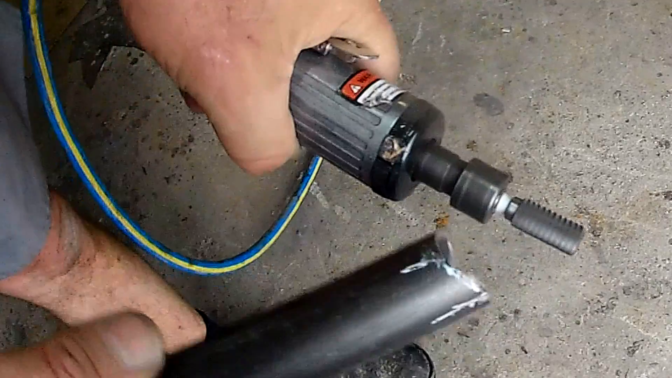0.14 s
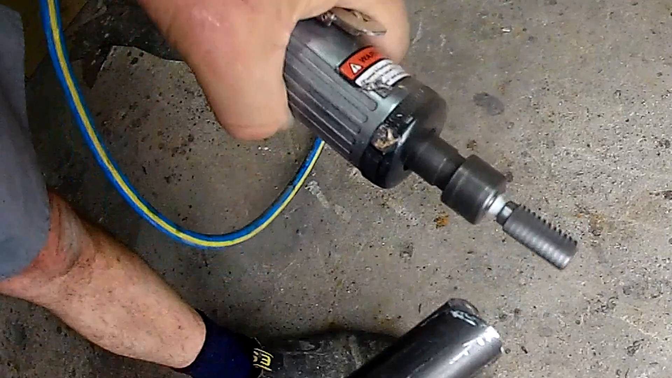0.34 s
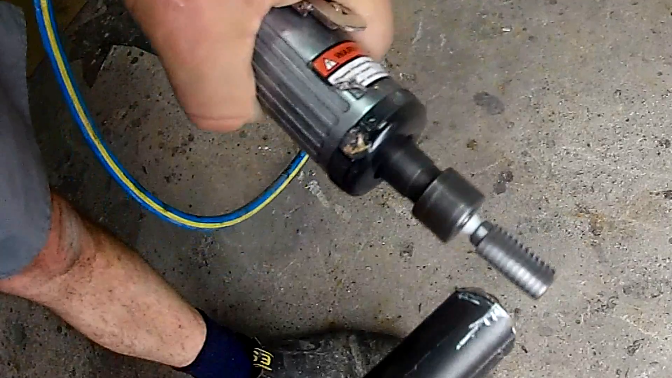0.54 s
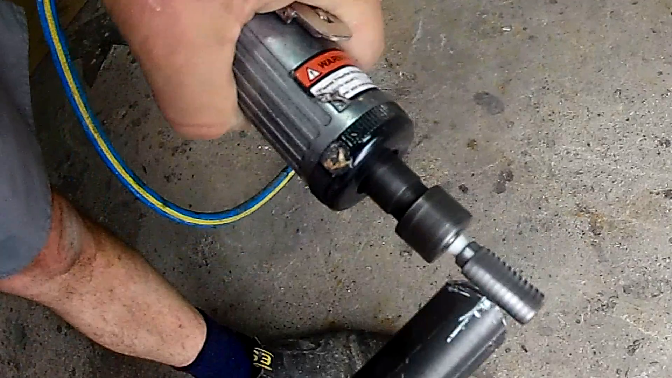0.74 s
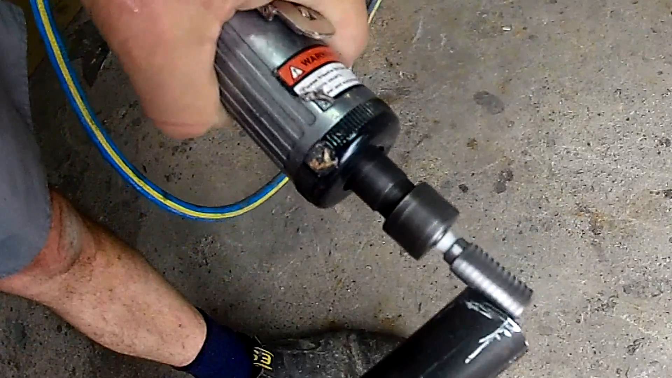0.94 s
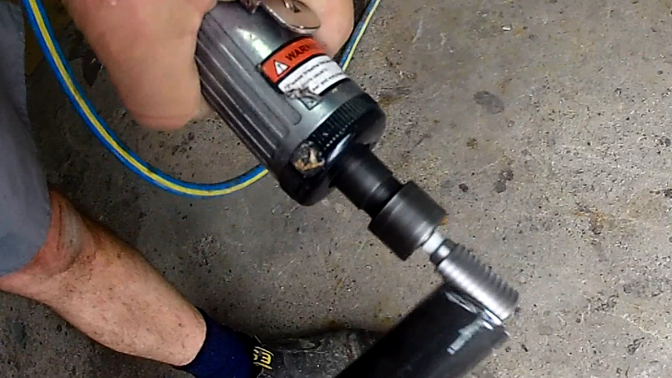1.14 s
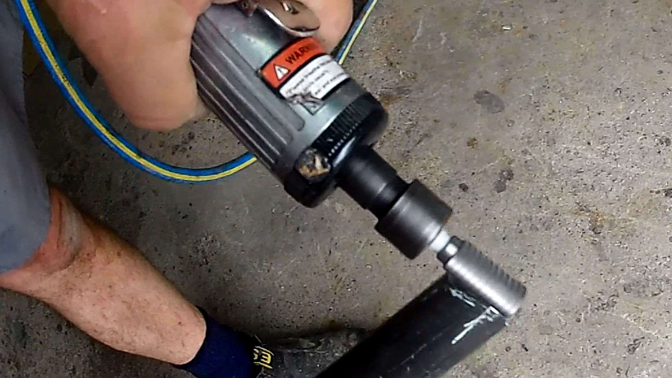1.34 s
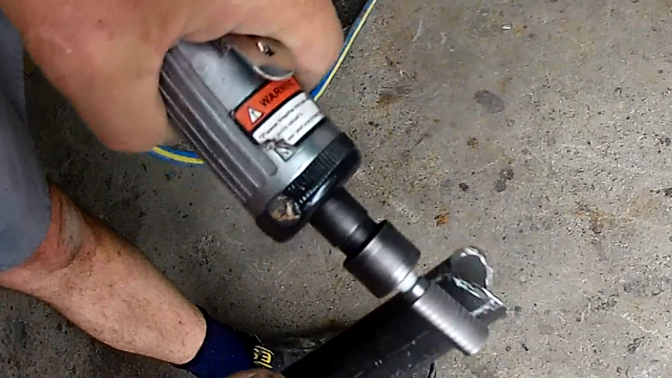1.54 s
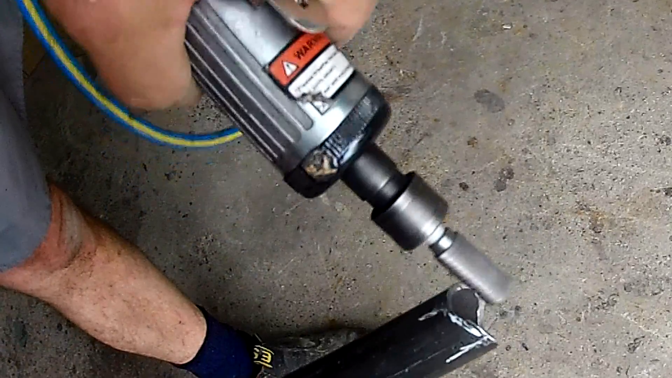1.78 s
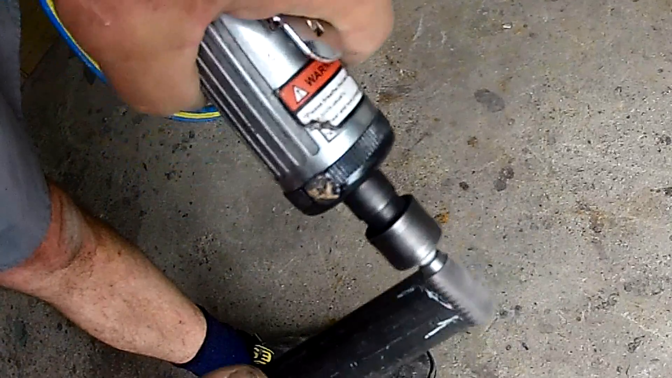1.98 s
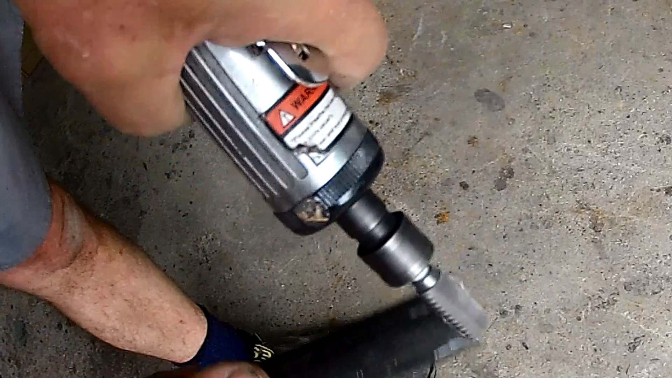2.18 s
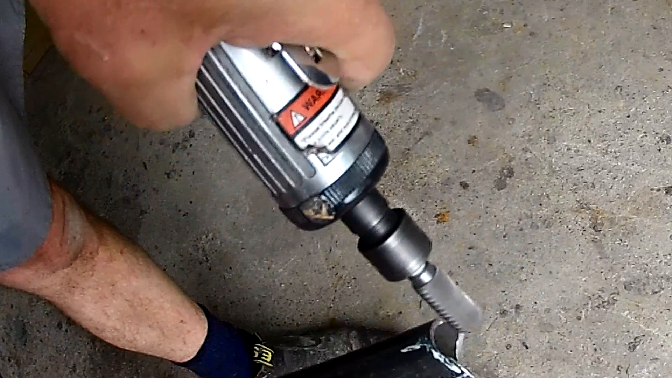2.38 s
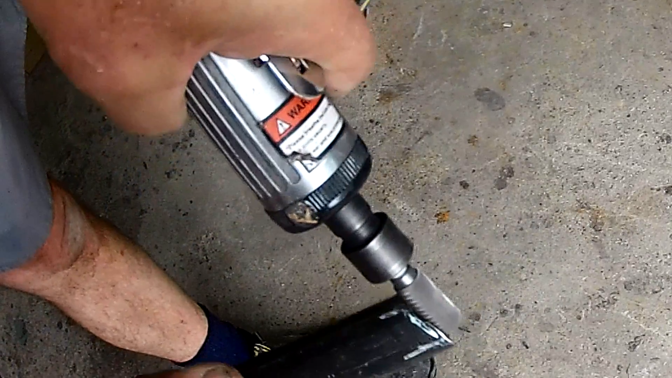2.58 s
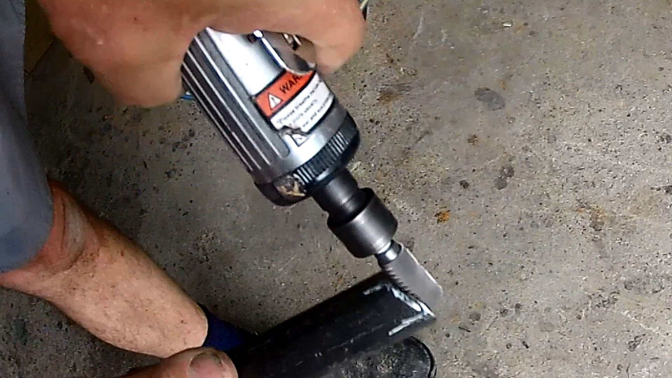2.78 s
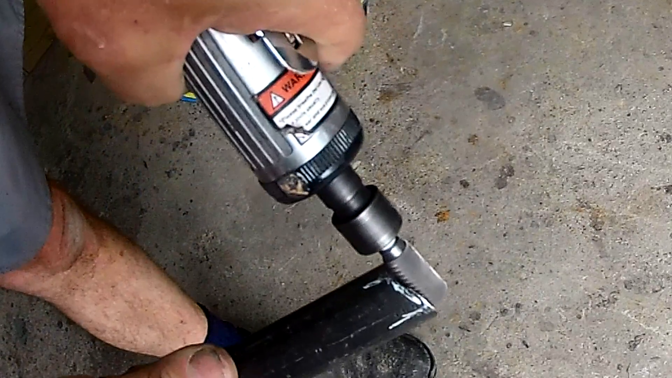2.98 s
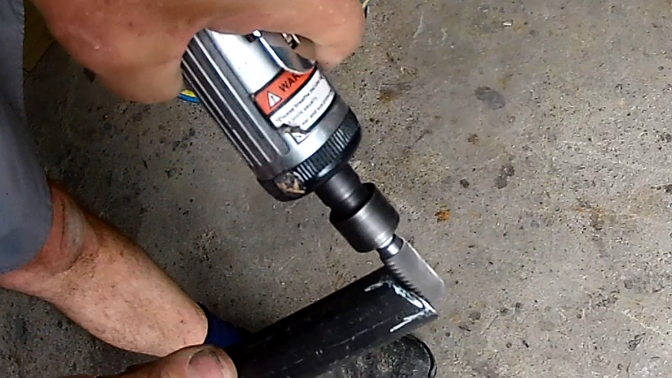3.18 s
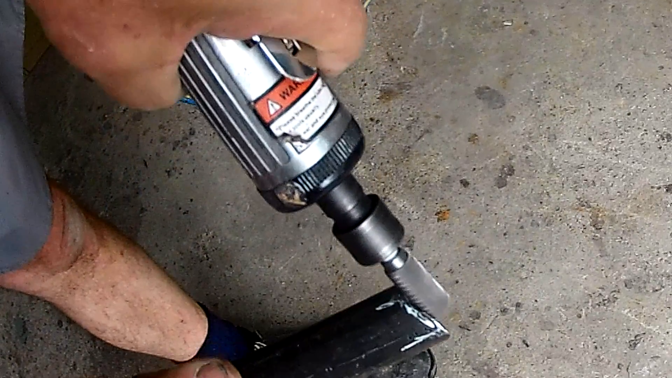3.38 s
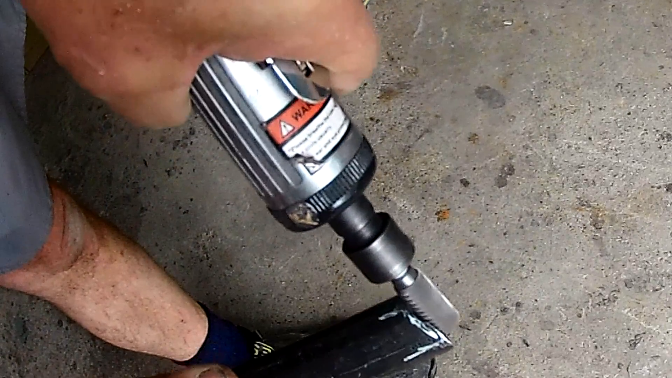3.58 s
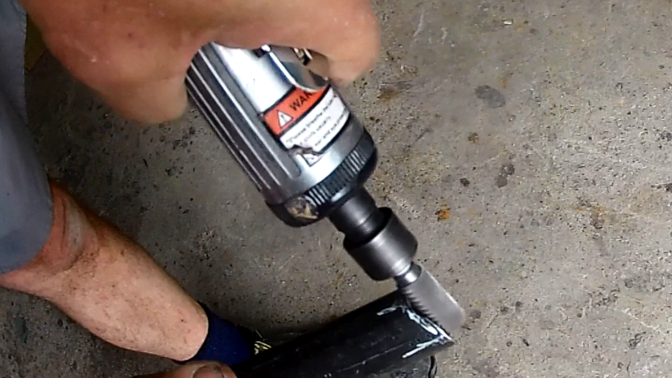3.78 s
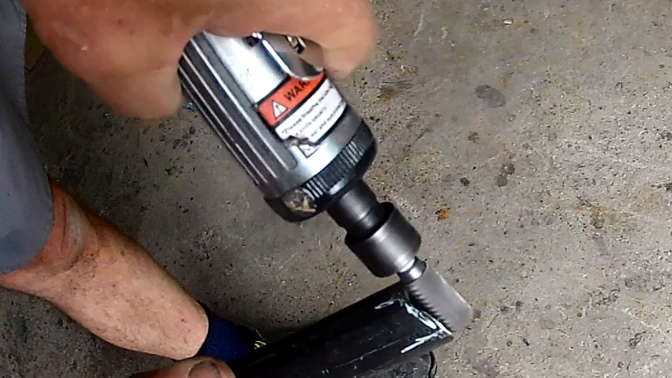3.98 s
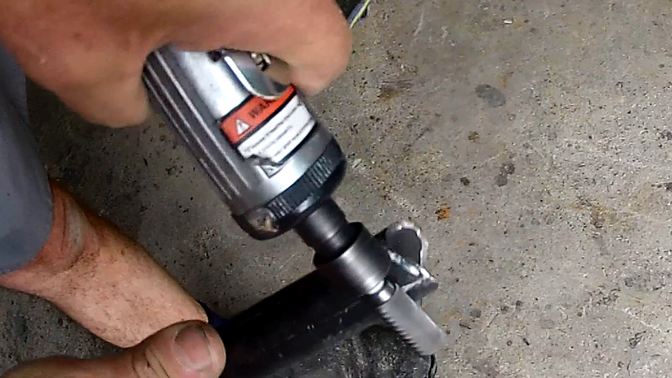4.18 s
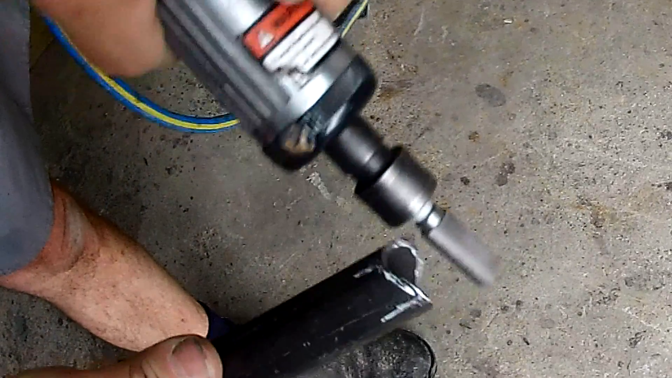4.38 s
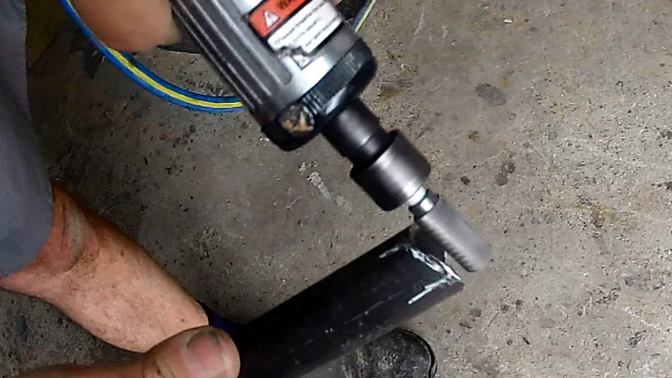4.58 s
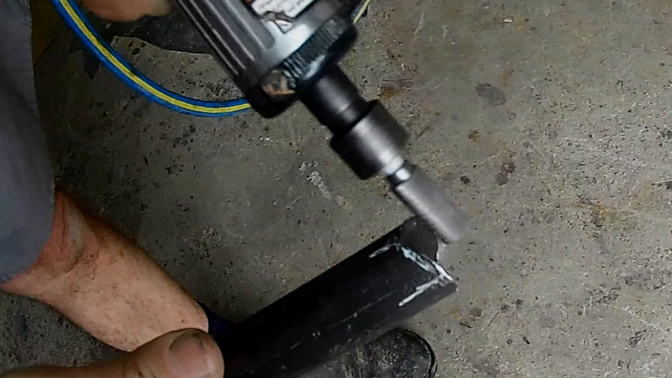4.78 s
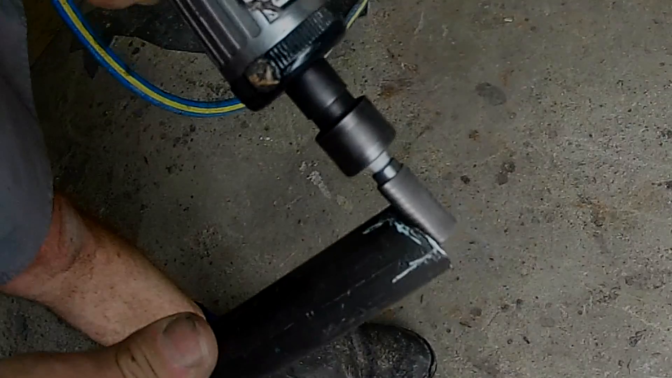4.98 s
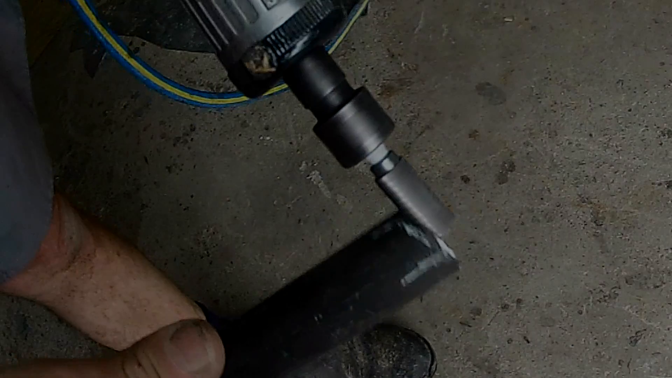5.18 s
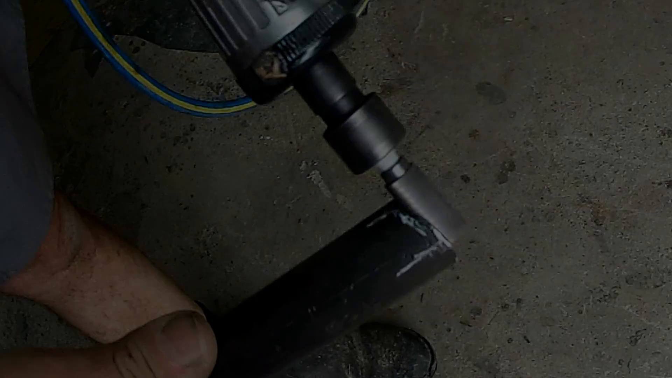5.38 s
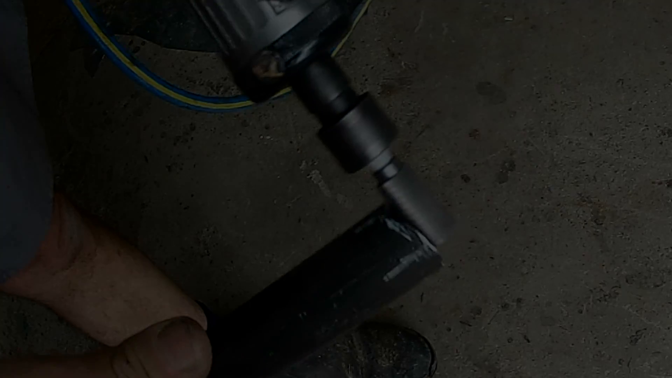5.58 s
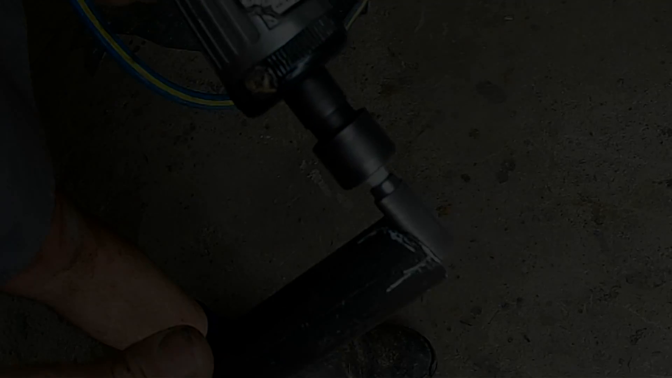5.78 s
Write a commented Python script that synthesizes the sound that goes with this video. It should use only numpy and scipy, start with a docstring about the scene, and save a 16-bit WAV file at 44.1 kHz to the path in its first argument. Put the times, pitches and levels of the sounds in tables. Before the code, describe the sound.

A close air grinder spins up suddenly with a rush of air, then keeps up a shrill whine and hissing exhaust in a workshop. Its toothed tip grazes the end of a steel pipe, making light chatter and brief ringing ticks that come in clusters. The pitch gradually sags, and toward the end the bites grow harder and more frequent, each slowing the tool for an instant.

```python
"""An air die grinder bursts up to speed and whines while its carbide burr skims the end of a steel pipe.
Four vanes on the rotor chop the air into puffs, which make the whine and pulse the hissing exhaust.
Now and then the burr (the toothed cutting tip) bites, rings the pipe and briefly brakes the rotor.
Quiet workshop air lies underneath, with a dull pop from the air valve and a few low thuds.
The recorder samples at 12 kHz and holds each sample, so the sound is mirrored above 6 kHz."""
import sys
import numpy as np
from scipy import signal
from scipy.fft import rfft, irfft
from scipy.io import wavfile

SR = 44100
rng = np.random.default_rng(int(sys.argv[2]) if len(sys.argv) > 2 else 0)


def unload_wav(signal):
    """Save mono or channel-first audio to the path in sys.argv[1] as 16-bit WAV at rate SR, clipped to [-1, 1]."""
    wavfile.write(
        sys.argv[1],
        SR,
        np.round(np.clip(np.atleast_2d(signal).T, -1, 1) * 32767).astype(np.int16),
    )


N = 257215

# Bites of the burr; braking or dips below zero count as none: (time [s], blow to the pipe's lowest
# tone [dB], blow to its higher tones [dB], braking strength [%], strength of the level dip [dB])
BITES = [(1.135, -28, -21, 0, .5), (1.3158, -23, -14, 1.5, 2), (1.361, -35, -16, 1.5, 2),
         (1.4531, -27, -28, 1.5, -3), (1.6737, -27, -23, -0.5, 2.5), (2.051, -29, -18, 2.5, 3.5),
         (2.236, -25, -16, 0.26, 1), (2.767, -37, -18, 1, 2), (2.8993, -33, -13, 0.43, 1.5),
         (2.9128, -44, -14, .5, -0.5), (3.0564, -39, -27, 2, 1.5), (3.0898, -24, -15, 1.5, 1),
         (3.134, -24.4, -18, -0.5, 2), (3.164, -29, -10.5, .5, 0), (3.1989, -27, -12, .5, 1),
         (3.238, -30, -14, 0, -2), (3.416, -37, -15, 1.5, 1.5), (3.6633, -38, -11, 3, 3.5),
         (3.7681, -38, -17, 0.25, -3), (3.894, -39, -30, 2.1, 2), (4.0335, -40, -23, 1.67, -2.5),
         (4.264, -30, -16, 1.5, 1), (4.3504, -36, -18, .5, -0.5), (4.711, -17, -13, 7.5, 3),
         (4.837, -22, -13, 7, 0.5), (4.9887, -27, -9, 3.5, 5.5), (5.01, -40, -11, 1.5, 2),
         (5.118, -22, -19, 3.5, 1), (5.1711, -36, -16, 3.5, 0), (5.189, -38, -19, 1.2, -1.5),
         (5.241, -30, -16, 2, -1), (5.302, -24, -20, 3.5, 1.5), (5.347, -29, -10.5, 2, 1),
         (5.3735, -24, -15, -0.06, 1), (5.4256, -31, -24, 3.5, -3), (5.4684, -24, -16, 4, 4),
         (5.5523, -22, -18, 3.5, 5.5), (5.613, -30, -14, 1.5, 4), (5.669, -22, -27, 2.5, 4),
         (5.7232, -22, -12, 2.5, 8.5), (5.801, -39, -11.5, 9, 11)]
# How hard the teeth skim the steel: (time [s], level [dB])
SKIM = [(.6, -87), (.9, -59), (1.1, -41.5), (1.7, -41), (2.0, -59), (2.6, -44), (3.1, -41), (4.5, -45.5),
        (5.0, -39), (5.83, -40)]
VALVE_S, START_S, SPIN_S = .133, .148, .154  # the valve opens, the whine starts, the rotor races up


def gain_of(db):
    """Turns decibels into a factor to multiply by."""
    return 10 ** (np.asarray(db) / 20)


def evened(x):
    """Scales a signal to an average power of 1."""
    return x / np.sqrt(np.mean(x ** 2) + 1e-20)


def clock():
    """The time of every sample, in seconds."""
    return np.arange(N) / SR


def curve(points):
    """Joins (time, value) points with straight lines."""
    return np.interp(clock(), *np.transpose(points))


def coloured(x, points):
    """Shapes the lows and highs of x by (frequency [Hz], level [dB]) points, then sets its power to 1."""
    f, db = np.transpose(points)
    hz = np.fft.rfftfreq(N, 1 / SR)
    shape_db = np.interp(np.log(hz + 1), np.log(f + 1), db)
    return evened(irfft(rfft(x) * gain_of(shape_db), N))


def wander(hz):
    """A random wobble that changes up to about hz times a second."""
    return evened(signal.lfilter(*signal.butter(2, hz, fs=SR), rng.standard_normal(N)))


def pulses(times, sizes, rise_s, fall_s):
    """A quick rise and a slower return after every event."""
    since = [np.maximum(clock() - s, 0) for s in times]
    return sum(size * (1 - np.exp(-u / rise_s)) * np.exp(-u / fall_s) for size, u in zip(sizes, since))


def workshop():
    """Still workshop air: a soft noise that falls back once the tool runs."""
    # Tone of the room: (frequency [Hz], relative level [dB])
    colour = [(30, -25), (100, -3), (200, -6), (400, -10), (800, -14), (1500, -20), (3000, -23),
              (4300, -20), (5200, -27), (6000, -40)]
    level_db = -52 - 5 * (clock() > VALVE_S)
    return gain_of(level_db) * coloured(rng.standard_normal(N), colour)


def thuds():
    """Short, low pushes with the deepest bass taken out."""
    # Low jolts: (time [s], relative level [dB])
    jolts = [(0.155, -28), (1.0, -40), (4.838, -47), (4.991, -38), (5.347, -45), (5.723, -40)]
    times, db = np.transpose(jolts)
    pushes = pulses(times, gain_of(db), rise_s=.0013, fall_s=.0037)
    return 7.1 * signal.lfilter(*signal.butter(2, 50, "high", fs=SR), pushes)


def valve():
    """The valve opens with one dull pop of pressure."""
    age = np.maximum(clock() - VALVE_S, 0) / .00027  # the pop peaks at age 1
    return -gain_of(-25) * np.e * age * np.exp(-age)


def pipe():
    """Bites and random tooth strikes ring the pipe's own tones; bites also scrape."""
    # Pipe tones: (pitch [Hz], level [dB], time to fade by 60 dB [s], group [0 lowest, 1 higher])
    tones = [(1320, 3, .055, 0), (2330, -13, .03, 1), (3260, 4, .05, 1), (4150, -9, .035, 1),
             (5210, -2, .035, 1)]
    # Grit of a bite: (frequency [Hz], relative level [dB])
    grit = [(300, -25), (1000, -2), (3000, -6), (5500, -13), (6000, -26)]
    strike_db = 3 * np.minimum(rng.exponential(1, N), 3)
    strikes = gain_of(strike_db + curve(SKIM)) * (rng.random(N) < 250 / SR)  # about 250 a second
    times, *bite_db = np.transpose(BITES)[:3]
    ring_t, ringing = np.arange(4096) / SR, np.zeros(N)
    contact = 1 - np.exp(-ring_t / .0015)  # softens the start of each ring
    for hz, db, fade_s, group in tones:
        blows = strikes * rng.standard_normal(N)  # a strike hits each tone differently
        blows[np.round(times * SR).astype(int)] += gain_of(bite_db[group])
        ring = contact * gain_of(db - 60 * ring_t / fade_s) * np.sin(2 * np.pi * hz * ring_t)
        ringing += signal.oaconvolve(blows, ring)[:N]
    scraping = pulses(times, gain_of(bite_db[0] + 2), rise_s=.0011, fall_s=.0084)
    return ringing + scraping * coloured(rng.standard_normal(N), grit)


def rotor():
    """Air spins the rotor and the burr brakes it. Gives the free puff rate [Hz] and angle [radians]."""
    # Free speed, sagging as the air line empties: (time [s], vane puffs [Hz])
    speed = [(.3, 1253), (.42, 1234), (.55, 1220), (.9, 1167), (1.2, 1123), (1.45, 1086), (1.6, 1065),
             (1.8, 1062), (2.1, 1041), (2.3, 1026), (2.55, 1021), (2.75, 998.6), (3.1, 976), (3.5, 971),
             (3.72, 963.4), (4.2, 939.5), (4.33, 944), (4.65, 943), (5.2, 929), (5.6, 917.4), (5.83, 918)]
    fill_s, inertia_s = .008, .033  # the chamber takes time to fill, the rotor to catch up
    kick = .15  # share of full speed from the first shove of air
    free_hz, since = curve(speed), np.maximum(clock() - SPIN_S, 0)
    lag = (inertia_s * np.exp(-since / inertia_s) - fill_s * np.exp(-since / fill_s)) / (inertia_s - fill_s)
    times, _, _, percent, _ = np.transpose(BITES)
    braking = pulses(times, np.maximum(percent, 0) / 100, rise_s=.007, fall_s=.028)
    drag = gain_of(curve(SKIM) - 12) * wander(32)  # skimming teeth tug at the rotor
    puff_hz = free_hz * (1 - (1 - kick) * lag) * (1 - braking + drag + .001 * wander(42))
    return free_hz, 2 * np.pi * np.cumsum(puff_hz) / SR / 4  # four puffs make one turn


def exhaust(free_hz, angle):
    """Escaping air hisses, puffing once a vane and once a turn; it also rumbles and sizzles."""
    # Jet through the muffler at high and at low air pressure: (frequency [Hz], relative level [dB])
    fast_colour = [(150, -33), (300, -20), (700, -13.5), (1200, -7), (1600, -13.5), (2200, -3),
                   (2650, -10.5), (3200, 1.5), (3700, -3), (4200, 6), (4600, -2.5), (5150, 4.5), (5600, -1),
                   (6000, -14)]
    slow_colour = [(150, -66), (300, -24.5), (700, -28.5), (1200, -19), (1600, -19.5), (2200, -12),
                   (2600, -14.5), (3200, -7), (3700, -10.5), (4200, -4), (4600, -6.5), (5150, -5),
                   (5600, -16), (6000, -14.5)]
    # Strength of the hiss: (time [s], level [dB])
    hiss_levels = [(.2, -18), (.35, -20), (.6, -21.5), (1.0, -19), (1.7, -20), (2.5, -21.5), (3.2, -16),
                   (3.7, -18.5), (4.2, -18), (4.7, -19.5), (5.83, -18)]
    # Air buffeting the microphone: (time [s], level [dB]), then (frequency [Hz], relative level [dB])
    rumble_levels = [(0.14, -39), (0.69, -56), (1.04, -44), (1.61, -48), (1.94, -52), (3.0, -53),
                     (4.0, -52), (5.83, -52)]
    rumble_colour = [(20, -30), (50, -14), (100, -15), (200, -0.5), (400, -5), (900, -49)]
    # A high band that swells as the tool turns in the hand:
    # (time [s], level [dB]), then (frequency [Hz], relative level [dB])
    sizzle_levels = [(.3, -26), (1.0, -33), (1.4, -20.5), (1.8, -22.5), (2.3, -24.5), (2.8, -48),
                     (3.5, -53), (4.2, -32), (4.6, -23), (5.0, -21.5), (5.4, -29.5), (5.83, -24)]
    sizzle_colour = [(4300, -44), (4800, -14), (5200, -0.5), (5500, -13.5), (5800, -23)]
    slow_hz, fast_hz = 882, 1170  # puff rates at which each hiss colour is heard alone
    puffs = 1 + .17 * np.cos(angle) + .1 * np.cos(4 * angle)
    jet = puffs * gain_of(.89 * wander(160)) * rng.standard_normal(N)
    fast = np.clip((free_hz - slow_hz) / (fast_hz - slow_hz), 0, 1)
    hiss = fast * coloured(jet, fast_colour) + (1 - fast) * coloured(jet, slow_colour)
    blast_db = 9 * np.exp(-np.maximum(clock() - SPIN_S, 0) / .047)  # the first rush of air
    hiss *= gain_of(curve(hiss_levels) + blast_db)
    rumble = gain_of(curve(rumble_levels)) * coloured(rng.standard_normal(N), rumble_colour)
    sizzle = gain_of(curve(sizzle_levels)) * coloured(rng.standard_normal(N), sizzle_colour)
    flow = np.clip((clock() - VALVE_S) / .026, 0, 1)  # pressure builds behind the valve
    return flow * (hiss + rumble + sizzle)


def shaft_hum(angle):
    """An off-balance rotor and unequal vanes add faint, wavering tones."""
    # Tones from unequal vanes: (cycles per turn [count], relative level [dB])
    unequal_vanes = [(3, -50.5), (6, -50.5), (9, -43.5), (10, -39), (13, -37), (14, -40), (17, -37)]
    # Rotor unbalance: (time [s], once-a-turn level [dB], twice-a-turn level [dB])
    unbalance = [(.15, -37, -39), (.4, -42, -51), (1.2, -39, -49), (1.7, -41.5, -49), (2.4, -47.5, -49.5),
                 (3.2, -45, -41.5), (4.2, -48.5, -47.5), (5.83, -44.5, -47.5)]
    times, *levels = np.transpose(unbalance)
    tones = unequal_vanes + [(k, np.interp(clock(), times, db)) for k, db in enumerate(levels, 1)]
    return sum(gain_of(db + 1.9 * wander(24)) * np.sin(k * angle + k) for k, db in tones)


def vane_whine(angle):
    """Four puffs a turn blend into a whine of five harmonics: tones at 1 to 5 times the puff rate."""
    # The whine changes colour as the tool slows and turns: (time [s], levels of harmonics 1 to 5 [dB])
    colour = [(.155, -15, -24, -32, -38, -38), (0.165, -12.5, -17, -38, -38, -31),
              (.18, -22.5, -27, -36, -30, -22), (0.191, -17.5, -40, -25, -26, -29),
              (.215, -23, -41, -23, -26, -34), (.24, -23, -32, -25, -24, -37),
              (.27, -23, -20.5, -31, -21, -32), (.3, -20, -30, -32, -18.5, -42),
              (.55, -22.5, -35, -29.5, -16.5, -46), (.74, -27, -25, -32, -18.5, -39),
              (.88, -19.5, -24.5, -35, -19, -39), (1.15, -21.5, -25, -21, -17.5, -37),
              (1.4, -27, -26, -18.5, -32, -32), (1.52, -23, -28.5, -20, -22.5, -25),
              (1.72, -35.5, -36.5, -18.5, -16.5, -28), (2.1, -27.5, -28, -22, -21.5, -24.5),
              (2.4, -27, -30, -20.5, -17.5, -23.5), (2.7, -19, -29, -20.5, -20.5, -27.5),
              (3.1, -23, -30, -18, -23.5, -33), (3.6, -19, -29, -18.5, -24.5, -33),
              (3.95, -20.5, -31.5, -16.5, -29.5, -40), (4.6, -20, -35, -18.5, -20, -29),
              (5.0, -19, -38, -22.5, -21.5, -26.5), (5.3, -18.5, -36.5, -22, -22, -25.5),
              (5.83, -20, -35, -21.5, -24, -32)]
    # Brief dips, one list per harmonic: (time [s], depth [dB], half length [s])
    dropouts = [
        [(.72, 6.5, 0.032), (1.1, 5.5, 0.039), (1.45, 10, 0.015), (1.71, 8, .015), (2.12, 9, 0.022),
         (5.49, 7, 0.011)],
        [(.23, 12, 0.025), (.36, 10, .02), (.6, 18, 0.034), (.82, 16, 0.013), (1.31, 8, 0.0083), (1.6, 6, .03),
         (1.82, 10, .012)],
        [(.28, 10, .02), (1.94, 8, 0.018), (4.48, 5, 0.06), (4.725, 6, 0.0086), (4.845, 6, .008),
         (5.11, 8, .025), (5.22, 9, 0.014)],
        [(1.44, 6, 0.016), (2.45, 5, 0.055), (3.62, 4, 0.026), (4.725, 7, 0.011), (4.85, 7, .01)],
        [(1.55, 14, .02), (1.8, 12, 0.037)],
    ]
    # How much swirling air smears each harmonic: (share [0 to 1])
    roughness = [.08, .15, .12, .15, .25]
    t, whine = clock(), np.zeros(N)
    times, *levels = np.transpose(colour)
    for k, (db, dips, rough) in enumerate(zip(levels, dropouts, roughness), 1):
        dip_db = sum(depth * np.exp(-((t - at) / half_s) ** 2) for at, depth, half_s in dips)
        smear = np.sqrt(1 - rough ** 2) + rough * wander(33.4)
        whine += gain_of(np.interp(t, times, db) - dip_db) * smear * np.sin(4 * k * angle + k)
    return whine


def scene():
    """Mixes everything into two equal channels; grinder and pipe dip briefly after most bites."""
    background = workshop() + thuds() + valve()
    free_hz, angle = rotor()
    fade_in = np.clip((clock() - START_S) / .0096, 0, 1)
    tones = fade_in * np.sqrt(2) * (vane_whine(angle) + shaft_hum(angle))
    grinding = tones + exhaust(free_hz, angle) + pipe()
    times, *_, depth_db = np.transpose(BITES)
    dip_db = pulses(times + .005, np.maximum(depth_db, 0), rise_s=.005, fall_s=.05)
    return np.tile(background + grinding * gain_of(-dip_db), (2, 1))


def record(dry):
    """The recorder rounds off loud peaks, then takes and holds samples, which adds high mirror tones."""
    ceiling, hold_hz, top_hz = 1.3, 12000, 15380
    hz = np.fft.rfftfreq(N, 1 / SR)
    rounded = np.tanh(dry / ceiling) * ceiling
    narrow = irfft(rfft(rounded) * (hz < hold_hz / 2), N)
    mirrored = narrow * (1 + 2 * np.cos(2 * np.pi * hold_hz * clock() + .61))
    held = irfft(rfft(mirrored) * np.sinc(hz / hold_hz), N)  # holding softens the treble
    treble_cut = signal.firwin(511, top_hz, window=("kaiser", 9), fs=SR)
    return signal.oaconvolve(held, treble_cut[None], "same")


dry = scene()
out = record(dry)
unload_wav(out)
```